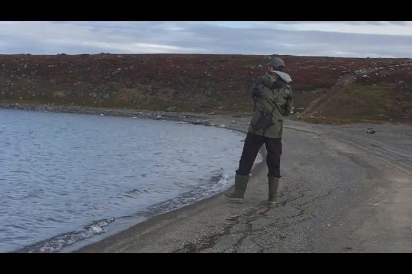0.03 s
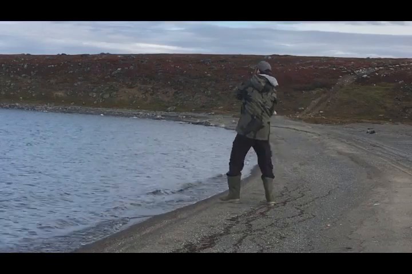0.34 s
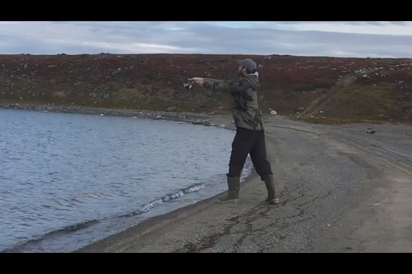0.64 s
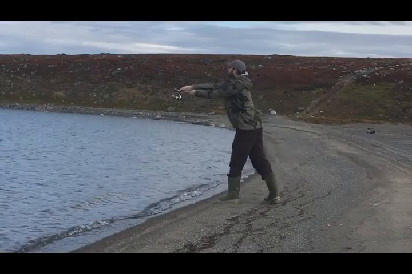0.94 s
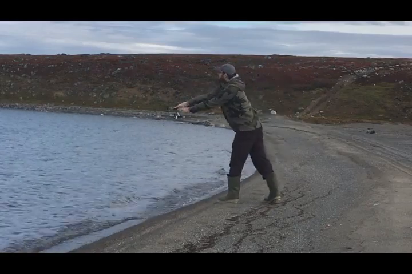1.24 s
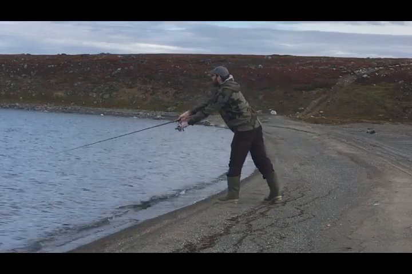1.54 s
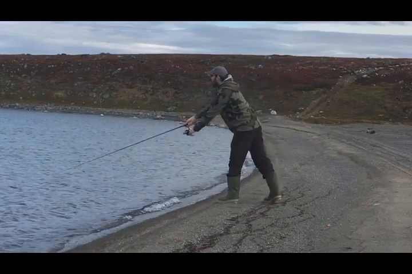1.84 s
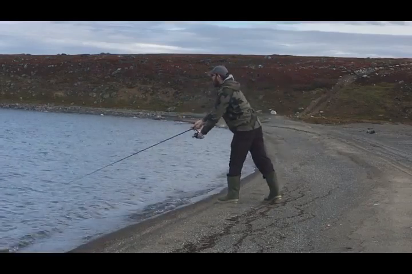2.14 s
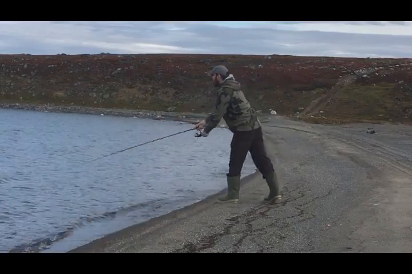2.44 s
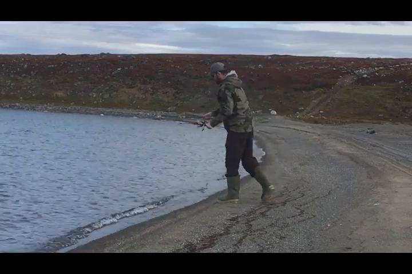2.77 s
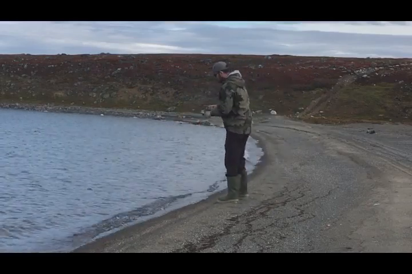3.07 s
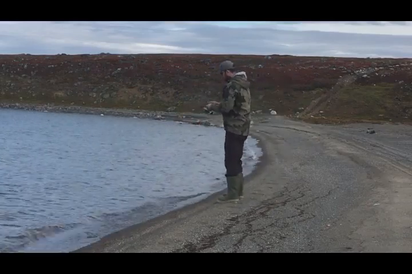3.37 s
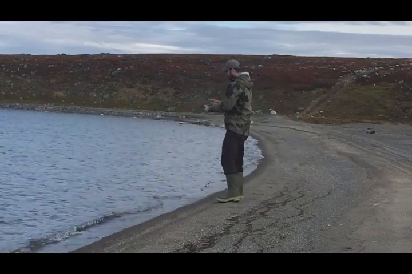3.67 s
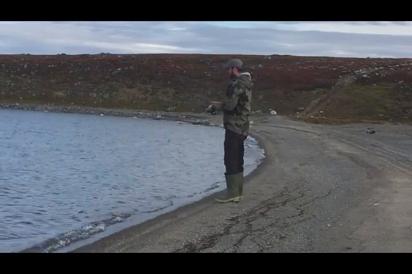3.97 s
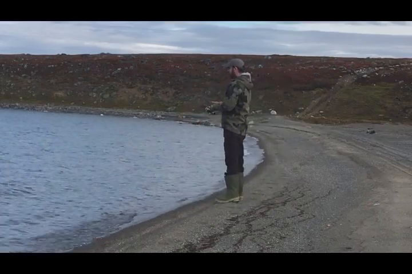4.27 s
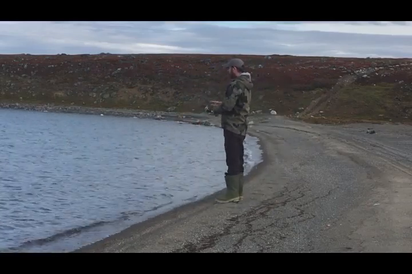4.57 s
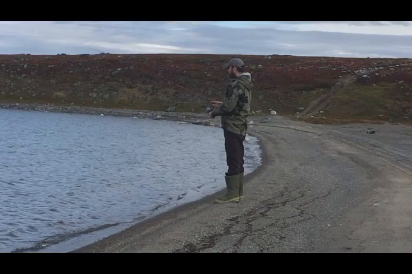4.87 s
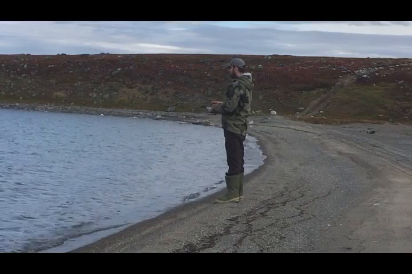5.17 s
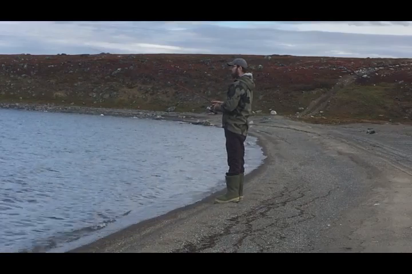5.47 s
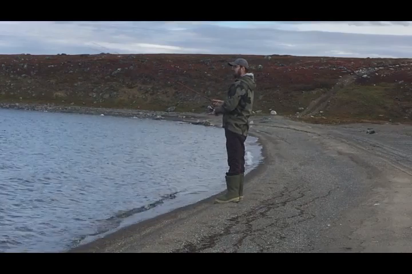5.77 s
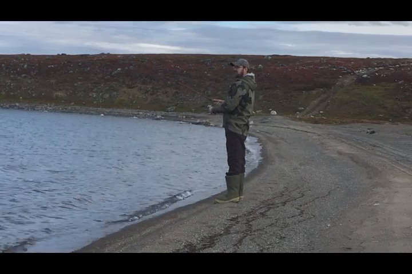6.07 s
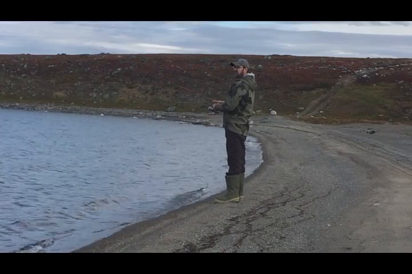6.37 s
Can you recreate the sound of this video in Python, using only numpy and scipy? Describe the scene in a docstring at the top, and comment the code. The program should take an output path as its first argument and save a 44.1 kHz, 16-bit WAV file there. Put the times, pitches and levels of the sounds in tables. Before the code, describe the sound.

Small waves lap close to the microphone on a gravel lakeshore throughout, each fizzing up the stones with a bubbly slosh, scattered plops and tiny ticks. Low wind rumbles on the microphone, and distant ripples make a faint, even wash. A wave breaks right at the start. At about 0.3 seconds a fishing rod gives a very faint falling whistle, then two quick, light swishes at 0.7 and 0.8 seconds. Line runs off the reel with a fluttering, ticking hiss that rises in pitch and fades by 1.4 seconds. More waves arrive around 1.5 and 2.5 seconds, the latter with a cluster of plops, and another near 3.8 seconds. The water eases between 4.5 and 5 seconds, then laps again. The wind gusts harder from about 5.3 to 6.2 seconds, and the strongest wave sloshes in at around 6.3 seconds.

```python
"""Small waves lap close by on a gravel lakeshore, with wind rumbling on the microphone.
Each wave fizzes up the stones with a slosh of bubbles close behind; here and there trapped air plops.
Early on an angler casts once: the rod whistles back and swishes forward, and the line whips off
the spool with a rising, ticking hiss. Behind it all, ripples wash steadily on the far shore."""
import sys
import numpy as np
from scipy import signal
from scipy.fft import rfft, irfft, next_fast_len
from scipy.io import wavfile
from scipy.ndimage import uniform_filter1d

SR = 44100
rng = np.random.default_rng(int(sys.argv[2]) if len(sys.argv) > 2 else 0)


def to_wav(s):
    """Save 16-bit WAV."""
    ch = np.atleast_2d(s).T  # columns
    pcm = np.round(np.clip(ch, -1, 1) * 32767)  # PCM
    wavfile.write(sys.argv[1], SR, pcm.astype(np.int16))


N = 287091
TIME = np.arange(N) / SR


def from_db(db):
    """Decibels to gain."""
    return 10 ** (np.asarray(db) / 20)


def rms_one(x):
    """Scale to unit power."""
    return x / np.sqrt(np.mean(x ** 2) + 1e-20)


def in_time(rows):
    """Each column of a curve at every sample."""
    seconds, *columns = np.transpose(rows)
    return [np.interp(TIME, seconds, column) for column in columns]


def at_hz(colour, hz):
    """Read a spectrum in dB; it falls away beyond its ends."""
    freqs, dbs = np.transpose(colour)
    return np.interp(np.log(hz), np.log(freqs), dbs, left=-120, right=-120)


def bandpass(x, low_hz, high_hz, order=2):
    """Keep the band between two frequencies."""
    return signal.sosfilt(signal.butter(order, [low_hz, high_hz], "band", fs=SR, output="sos"), x)


def add(out, start_s, sound):
    """Mix a short sound in at its start time."""
    start = int(start_s * SR)
    out[start:start + len(sound)] += sound[:max(N - start, 0)]


def drift(rate):
    """A smooth random wander that changes about `rate` times a second; spread 1."""
    step, settle = 40, 2000
    pole = np.exp(-2 * np.pi * rate * step / SR)
    noise = rng.standard_normal(N // step + settle + 2)
    slow = signal.lfilter([1], [1, -2 * pole, pole * pole], noise)[settle:]
    return np.interp(np.arange(N) / step, np.arange(len(slow)), rms_one(slow))


def grains(per_s, spread_db):
    """Random clicks of uneven size and sign; rms 1."""
    born = np.flatnonzero(rng.random(N) < per_s / SR)
    sizes = from_db(spread_db * np.minimum(rng.exponential(1, len(born)), 4))
    clicks = np.zeros(N)
    clicks[born] = sizes * rng.choice([-1, 1], len(born))
    return rms_one(clicks)


def contacts(rows, width):
    """Each contact is a tiny noise burst through one resonance, its width a share of its pitch."""
    out, t = np.zeros(N), TIME[:2048]
    for (s, db, hz, t60), noise in zip(rows, rng.standard_normal((len(rows), len(t)))):
        r = np.exp(-np.pi * width * hz / SR)
        feedback = [1, -2 * r * np.cos(2 * np.pi * hz / SR), r * r]
        burst = signal.lfilter([1, 0, -1], feedback, noise * from_db(-60 * t / t60))
        add(out, s, from_db(db) * burst / np.abs(burst).max())
    return out


def moving_resonance(x, hz, width, block=128):
    """A gliding resonance, its width a share of its centre; white noise keeps its power."""
    out, state = np.zeros(len(x)), np.zeros(2)
    for i in range(0, len(x), block):
        r = np.exp(-np.pi * width * hz[i] / SR)
        forward = np.sqrt((1 - r * r) / 2) * np.array([1, 0, -1])
        feedback = [1, -(1 + r * r) * np.cos(2 * np.pi * hz[i] / SR), r * r]
        out[i:i + block], state = signal.lfilter(forward, feedback, x[i:i + block], zi=state)
    return out


def water(colour, per_s, spread_db, grain_share, patchy_db, surge_db, flicker_rate):
    """Tiny bubbles ring briefly in third-octave bands, over a blur of countless smaller ones; rms 1."""
    edges_hz = 125 * 2 ** (np.arange(22) / 3)
    blur = rng.standard_normal((2, N))
    surge = surge_db * drift(flicker_rate)   # moves all bands together
    out = np.zeros(N)
    for k, (low, high) in enumerate(zip(edges_hz, edges_hz[1:])):
        level_db = at_hz(colour, np.sqrt(low * high))
        if level_db < -100:
            continue
        drive = np.sqrt(1 - grain_share) * blur[k % 2] + np.sqrt(grain_share) * grains(per_s, spread_db)
        band = bandpass(drive + 1e-18, low, high)
        out += band * from_db(level_db + surge + patchy_db * drift(flicker_rate))
    return rms_one(out)


def far_shore():
    """Distant ripples all along the bay merge into an even wash."""
    # The wash's spectrum. Each row: frequency in Hz, relative level in dB.
    colour = [(150, -11), (260, -2), (470, 0), (860, -3.5), (1400, -2.5), (2700, -11), (4000, -18.5),
              (6000, -23.5), (8500, -25), (15500, -29)]
    return from_db(-59.02) * water(colour, per_s=300, spread_db=3.0, grain_share=0.41,
                                   patchy_db=1.0, surge_db=0.5, flicker_rate=11.5)


def eddies(colour, even_s):
    """Turbulent pressure of a given spectrum, its strength held even over `even_s` seconds."""
    size = next_fast_len(N)
    hz = np.maximum(np.fft.rfftfreq(size, 1 / SR), 1)
    spectrum = rfft(rng.standard_normal(size)) * from_db(at_hz(colour, hz))
    pressure = irfft(spectrum, size)[:N]
    return pressure / np.sqrt(uniform_filter1d(pressure ** 2, int(even_s * SR)) + 1e-20)


def wind():
    """Right on the diaphragm, large eddies heave and rumble; small ones buffet it, most in gusts."""
    # Wind strength at the microphone. Each row: time in seconds, relative level in dB.
    strength = [(0, -39), (.2, -44), (.45, -48), (.9, -39), (1.2, -42), (2.1, -45), (2.7, -41.5),
                (3.6, -40.5), (4.3, -41.5), (4.85, -45), (5.3, -35), (5.95, -35), (6.3, -40)]
    # Short gusts on top. Each row: centre in seconds, extra level in dB.
    gusts = [(4.27, 3.5), (6.13, 6)]
    # Spectra of large, middling and small eddies. Each row: frequency in Hz, relative level in dB.
    heave_colour = [(2, -6.5), (8, 4), (14, -0.5), (19, -20)]
    rumble_colour = [(13, 4.5), (19, 2.5), (30, -6.5), (42, -13), (55, -15.5), (90, -45)]
    buffet_colour = [(30, -9), (50, -8.5), (65, -4), (85, -12), (115, -13.5), (160, -20.5), (230, -29.5),
                     (400, -38.5)]
    gust_s, breeze_db = 0.04, -42.5
    buffet_db, buffet_growth = -55, 1.19   # level in that breeze; dB more for each dB of wind
    wind_db, = in_time(strength)
    wind_db += sum(db * np.exp(-0.5 * ((TIME - s) / gust_s) ** 2) for s, db in gusts)
    wind_gain = from_db(wind_db)
    mean_gain = uniform_filter1d(wind_gain, SR)   # the largest eddies follow only the mean wind
    buffet_gain = from_db(buffet_db + buffet_growth * (wind_db - breeze_db))
    heave = mean_gain * from_db(11.5) * eddies(heave_colour, even_s=0.4)
    rumble = wind_gain * from_db(2.6) * eddies(rumble_colour, even_s=0.9)
    return heave + rumble + buffet_gain * eddies(buffet_colour, even_s=0.2)


def back_swing():
    """Air sheds eddies off the thin rod; the faint whistle falls as the rod slows."""
    # The whistle's path. Each row: time in seconds, relative level in dB, pitch in Hz.
    swing = [(0.22, -90, 8000), (0.29, -69, 7000), (0.32, -62, 5800), (0.345, -57, 4500),
             (0.37, -100, 4000)]
    level_db, pitch_hz = in_time(swing)
    swinging = (TIME > swing[0][0]) & (TIME < swing[-1][0])
    whistle = moving_resonance(rng.standard_normal(N), pitch_hz, width=0.09)
    return swinging * from_db(level_db - 6) * whistle


def rod_swishes(swish_s=0.015, centre_hz=2770):
    """The rod cuts the air twice, whipping forward and springing back."""
    # The two strokes. Each row: centre in seconds, level in dB.
    swishes = [(0.72, -50.5), (0.80, -53)]
    gain = sum(from_db(db) * np.exp(-0.5 * ((TIME - s) / swish_s) ** 2) for s, db in swishes)
    return gain * moving_resonance(rng.standard_normal(N), np.full(N, centre_hz), width=0.51)


def cast(coils_per_s=132, coast_at_s=1.08, slowing_s=0.24):
    """Coils flick off the spool, slowing as the lure coasts; hiss and slaps climb as the line flies."""
    # Line running out. Each row: time in seconds, relative level in dB, centre of the hiss in Hz.
    run = [(0.62, -73, 2500), (0.71, -60, 2550), (0.81, -52, 2880), (0.89, -57, 3900), (0.97, -56.5, 5940),
           (1.06, -54.5, 8100), (1.17, -58, 13100), (1.24, -58, 14800), (1.36, -73, 14500)]
    # Resonances of the spool lip. Each row: centre in Hz, width in Hz, level against the hiss in dB.
    lip_modes = [(4580, 2100, -8), (7730, 960, -8)]
    # Loops of line slapping the rod. Each row: start in seconds, peak in dB.
    slaps = [(0.796, -35.5), (0.813, -37.5), (0.894, -41), (0.937, -36), (1.034, -42), (1.06, -35),
             (1.129, -38), (1.160, -35), (1.201, -49), (1.300, -43)]
    # Line snapping off the finger. The row: start in seconds, peak in dB, pitch in Hz, t60 in seconds.
    release = [(0.675, -49, 13000, .025)]
    level_db, centre_hz = in_time(run)
    running = (TIME > run[0][0]) & (TIME < run[-1][0])
    coil_rate = coils_per_s * np.exp(-np.maximum(TIME - coast_at_s, 0) / slowing_s)
    turn = np.cumsum(coil_rate * (1 + 0.21 * drift(40))) / SR % 1
    flicks = (0.3 + np.exp(-turn / 0.1)) * from_db(2.5 * drift(70))   # one uneven pulse a coil
    rub = flicks / np.sqrt(np.mean(flicks[running] ** 2)) * rng.standard_normal((3, N))
    hiss = moving_resonance(rub[0], centre_hz, width=0.29)
    broad_hiss = from_db(-9) * bandpass(rub[1], 2000, 13000, order=1)
    lip = sum(from_db(db) * rms_one(bandpass(rub[2], hz - width / 2, hz + width / 2))
              for hz, width, db in lip_modes)
    line = running * from_db(level_db) * (hiss + broad_hiss + lip)
    lowest_hz, slap_t60_s = lip_modes[0][0], 0.005
    pitched_slaps = [(s, db, max(centre_hz[int(s * SR)], lowest_hz), slap_t60_s) for s, db in slaps]
    return line + contacts(pitched_slaps + release, width=0.13)


def bubbles(colour, low_hz, high_hz, per_s, cycles, spread_db, rise):
    """Single bubbles ring for some cycles and chirp upward; small ones are higher and shorter; rms 1."""
    out = np.zeros(N)
    for when, smallness, strength in rng.random((int(per_s * N / SR), 3)):
        hz = low_hz * (high_hz / low_hz) ** smallness
        t = TIME[:int(cycles / hz * SR)]
        age = t * hz / cycles
        level_db = at_hz(colour, hz) + spread_db * min(-np.log(1 - strength), np.pi)
        ring = np.sin(2 * np.pi * hz * t * (1 + rise * age / 2)) * from_db(-60 * age)
        add(out, when * N / SR, hz * from_db(level_db) * ring)
    return rms_one(out)


def plops(rise=0.012, swell=0.075, spray_db=-13):
    """Trapped air swells and rings, rising in pitch as it nears the surface, and throws some spray."""
    # Air pockets closing under a crest, and two ringing water drips near 1.84 s and 4.68 s. Each row: start in
    # seconds, relative level in dB, pitch in Hz, t60 in seconds.
    pockets = [(0.080, -37.5, 662, 0.063), (0.179, -38.5, 1148, 0.048), (0.781, -43, 1150, 0.069),
               (1.325, -40.5, 339, 0.055), (1.422, -41.5, 946, .04), (1.741, -42, 2480, 0.014),
               (1.844, -46, 3050, 0.028), (2.045, -37.5, 574, 0.027), (2.464, -33, 770, 0.055),
               (2.466, -40, 189, 0.13), (2.536, -44.5, 235, 0.12), (2.588, -40.5, 310, 0.058),
               (2.631, -33, 472, 0.04), (2.656, -30.5, 516, 0.023), (2.677, -30.5, 356, 0.036),
               (2.679, -36, 610, 0.041), (2.681, -33.5, 975, 0.032), (2.762, -39.5, 983, .035),
               (4.011, -39, 303, 0.046), (4.057, -35, 1220, 0.019), (4.677, -49.5, 3230, 0.019),
               (5.553, -39.5, 446, .045), (5.556, -42, 665, 0.02), (6.298, -33, 1900, 0.013),
               (6.301, -37.5, 284, 0.055), (6.333, -28.5, 1000, 0.015), (6.429, -30.5, 1590, .0056)]
    out, t = np.zeros(N), TIME[:SR // 5]
    for (s, db, hz, t60), noise in zip(pockets, rng.standard_normal((len(pockets), len(t)))):
        tone = np.sin(2 * np.pi * np.cumsum(hz * (1 + rise * t / t60)) / SR)
        spray = from_db(spray_db) * rms_one(bandpass(noise, hz / 2, min(hz * 2, SR / 3)))
        envelope = (1 - np.exp(-t / (swell * t60))) * from_db(-60 * t / t60)
        add(out, s, from_db(db) * envelope / envelope.max() * (tone + spray))
    return out


def surge_power(crest_s, rise_s, hold_s, fall_db_per_s):
    """The power of one surge of water: it swells smoothly to the crest, holds, then drains away."""
    rising = np.sin(np.pi / 2 * np.clip(1 + (TIME - crest_s) / rise_s, 0, 1)) ** 2
    draining = from_db(-fall_db_per_s * np.maximum(TIME - crest_s - hold_s, 0))
    return (rising * draining) ** 2


def shore_gains():
    """Strength of slosh, foam and spray as each wave drains into its backwash; overlaps add in power."""
    # Waves running up the gravel. Each row: crest time, rise and hold in seconds,
    # then relative levels of slosh, foam and fine spray in dB.
    run_ups = [(-0.02, 0.25, 0.14, -49.5, -54, -63.5), (0.255, 0.12, 0.024, -57.5, -66.5, -68.5),
               (0.67, 0.13, .39, -56, -55.5, -65.5), (1.502, 0.38, .21, -53, -56.5, -66),
               (2.013, 0.19, 0.051, -56, -58, -72), (2.478, 0.16, 0.26, -49.5, -54, -62),
               (2.998, 0.24, 0.065, -55, -60.5, -72.5), (3.826, 0.36, 0.27, -52, -55.5, -65),
               (4.49, 0.15, 0.33, -62.5, -71, -90), (4.984, 0.08, .06, -68.5, -65, -68.5),
               (5.15, 0.22, 0.1, -56, -60.5, -69), (5.526, 0.17, 0.18, -59, -61, -73.5),
               (5.967, 0.06, 0.036, -55.5, -52.5, -59), (6.04, .03, 0.013, -49, -54, -67),
               (6.266, 0.19, 0.041, -44.5, -49.5, -61.5), (6.474, 0.13, 0.06, -50, -52, -66.5)]
    # Crests slapping down at the water's edge. Each row: time in seconds, relative level in dB.
    laps = [(0.09, -60), (0.79, -53.5), (1.035, -46.5), (1.33, -51.5), (1.43, -58), (1.66, -49),
            (2.045, -50.5), (2.47, -53), (2.675, -47), (2.78, -52), (2.985, -50.5), (3.24, -57),
            (3.33, -55.5), (3.42, -55.5), (3.95, -49), (4.1, -53), (5.165, -52.5), (5.559, -46),
            (5.83, -54.5), (6.07, -57), (6.28, -50)]
    lag_s, pile_up_db = 0.016, 2.5   # the body trails the fizzing edge and piles up during the crest
    slosh, foam, spray = np.zeros((3, N))
    for s, rise_s, hold_s, slosh_db, foam_db, spray_db in run_ups:
        backwash = from_db(-15) ** 2 * surge_power(s, rise_s, hold_s, fall_db_per_s=31)
        build_db = pile_up_db * (np.clip((TIME - s) / hold_s, 0, 1) - 0.5)
        body = surge_power(s + lag_s, rise_s, hold_s - lag_s, fall_db_per_s=75)
        slosh += from_db(slosh_db + build_db) ** 2 * (body + backwash)
        foam += from_db(foam_db) ** 2 * (surge_power(s, rise_s, hold_s, fall_db_per_s=41) + backwash)
        spray += from_db(spray_db) ** 2 * (surge_power(s, rise_s, hold_s, fall_db_per_s=70) + backwash)
    for s, db in laps:
        slosh += from_db(db) ** 2 * surge_power(s, rise_s=0.061, hold_s=0, fall_db_per_s=202)
    return np.sqrt([slosh, foam, spray])


def waves():
    """On the near gravel, foam and spray fizz; big bubbles slosh and gurgle close behind."""
    # Spectra of slosh, foam and fine spray. Each row: frequency in Hz, relative level in dB.
    slosh_colour = [(120, -36), (190, -10.5), (300, -5), (470, 1.5), (700, -2.5), (1100, 0), (1700, -11),
                    (2600, -21.5), (4000, -34), (7000, -50)]
    foam_colour = [(700, -6.5), (1500, 2), (2700, 0.5), (3600, -6), (5000, -10), (7000, -26.5),
                   (12000, -21)]
    spray_colour = [(2800, -16), (4500, -2), (6300, 0), (8500, -4), (12500, -10), (15500, -13)]
    # Drops and pebbles. Each row: start in seconds, relative peak in dB, pitch in Hz, t60 in seconds.
    ticks = [(1.827, -44.5, 4570, .014), (1.846, -54, 12500, .012), (2.476, -47, 12500, .015),
             (2.988, -51, 7200, .02), (4.138, -47, 11200, 0.025), (4.140, -41, 3560, 0.009),
             (5.140, -43.5, 6850, 0.013), (6.333, -42, 7000, .006), (6.429, -42, 2580, .005)]
    slosh_gain, foam_gain, spray_gain = shore_gains()
    slosh = water(slosh_colour, per_s=160, spread_db=3.0, grain_share=0.43,
                  patchy_db=2.5, surge_db=1.06, flicker_rate=26)
    gurgle = bubbles(slosh_colour, 224.7, 1860, per_s=100, cycles=43, spread_db=1.5, rise=0.15)
    foam = water(foam_colour, per_s=450, spread_db=4.5, grain_share=0.47,
                 patchy_db=4.0, surge_db=1.05, flicker_rate=25)
    tinkle = bubbles(foam_colour, 1487, 5580, per_s=160, cycles=47, spread_db=1.0, rise=0.041)
    spray = water(spray_colour, per_s=800, spread_db=4.5, grain_share=0.6,
                  patchy_db=1.3, surge_db=1.5, flicker_rate=26)
    body = slosh_gain * from_db(-2) * (slosh + from_db(-4.5) * gurgle)
    fizz = foam_gain * from_db(-0.37) * (foam + from_db(-10) * tinkle)
    fizz += spray_gain * from_db(1.14) * spray
    return body + fizz + from_db(-4.5) * plops() + from_db(-1) * contacts(ticks, width=0.2)


def scene():
    """Everything reaches one microphone in the open air on the shore."""
    return (waves() + far_shore() + back_swing() + cast() + wind() + rod_swishes())[None]


def record(dry):
    """The microphone's housing colours the treble with a peak and two dips; the top is cut steeply."""
    # The housing's colour. Each row: centre in Hz, width in Hz, gain in dB.
    housing = [(8540, 1660, 6), (10160, 6500, -6), (15100, 4900, -7.5)]
    cutoff_hz = 15800
    for hz, width_hz, db in housing:
        band = signal.lfilter(*signal.iirpeak(hz, hz / width_hz, fs=SR), dry)
        dry = dry + (from_db(db) - 1) * band
    return signal.sosfilt(signal.ellip(10, 0.1, 80, cutoff_hz, fs=SR, output="sos"), dry)


dry = scene()
out = record(dry)
to_wav(out)
```